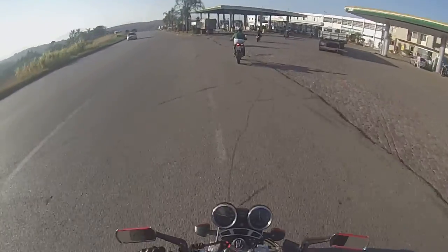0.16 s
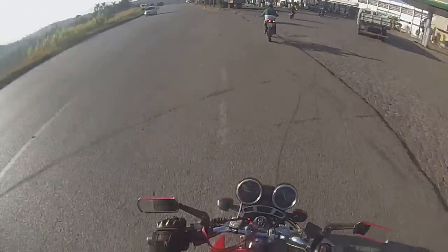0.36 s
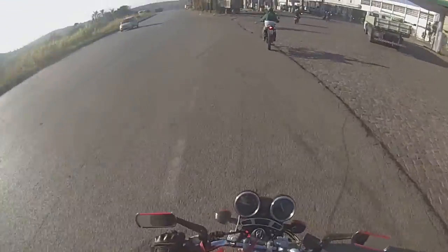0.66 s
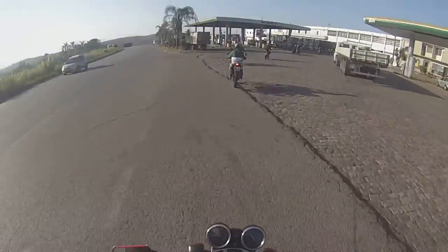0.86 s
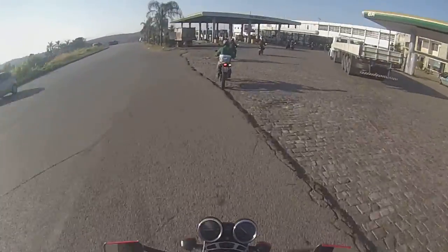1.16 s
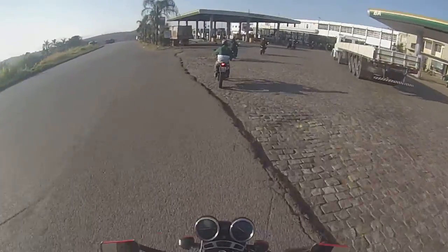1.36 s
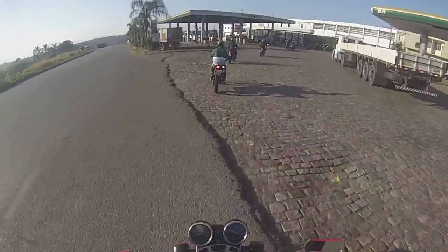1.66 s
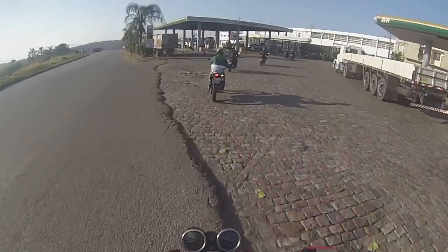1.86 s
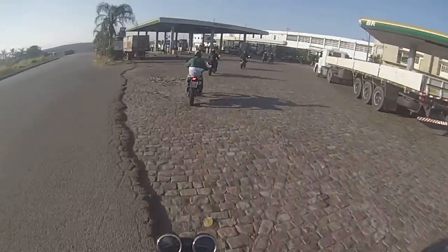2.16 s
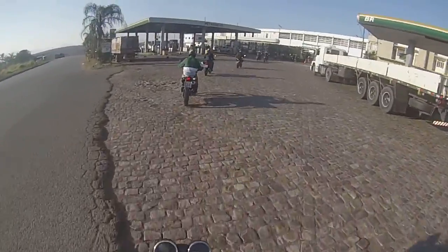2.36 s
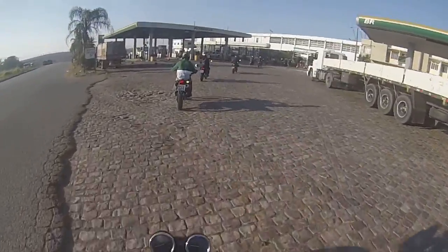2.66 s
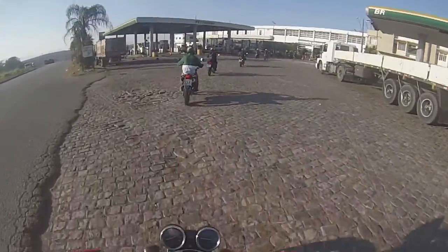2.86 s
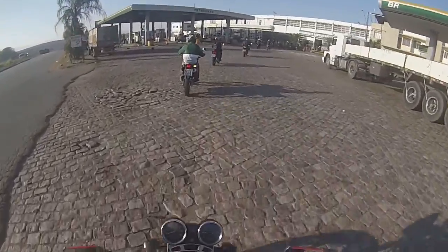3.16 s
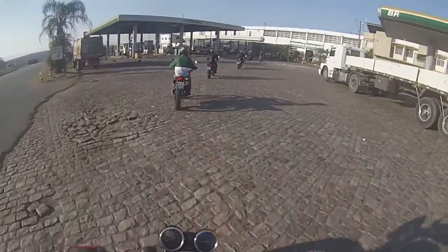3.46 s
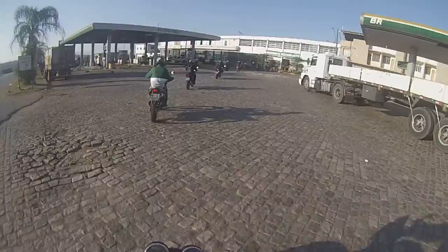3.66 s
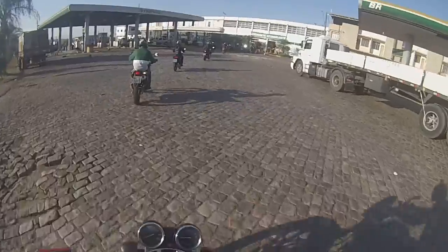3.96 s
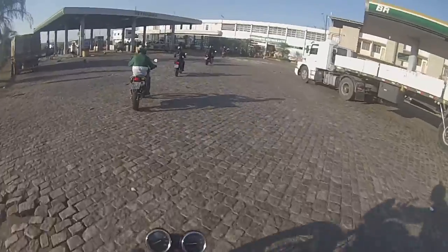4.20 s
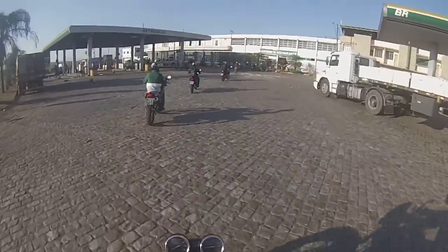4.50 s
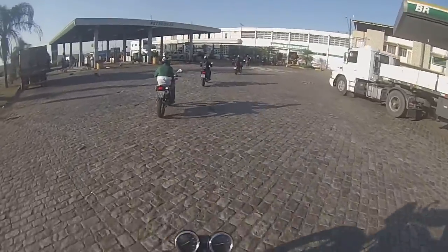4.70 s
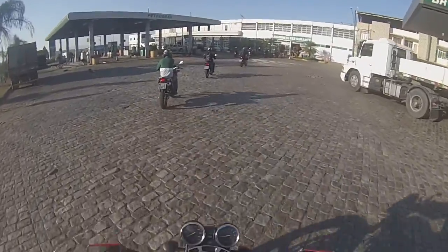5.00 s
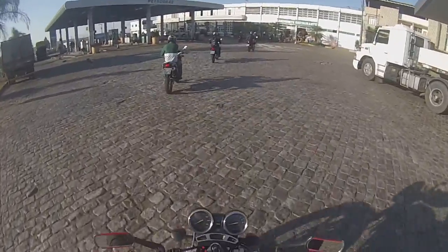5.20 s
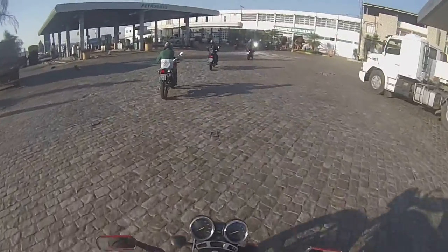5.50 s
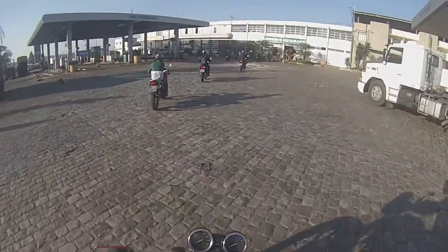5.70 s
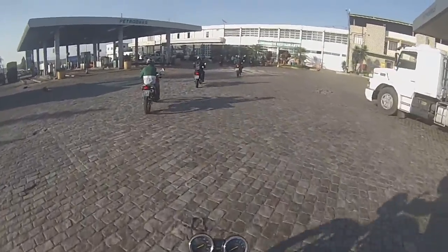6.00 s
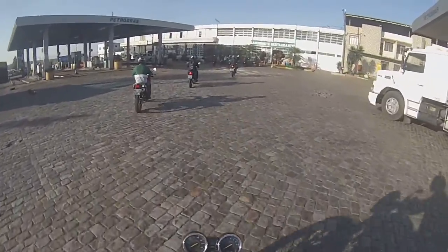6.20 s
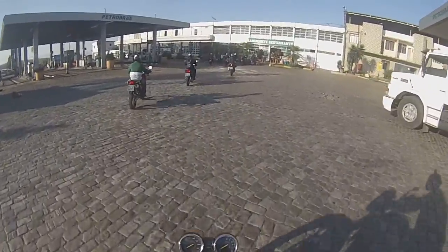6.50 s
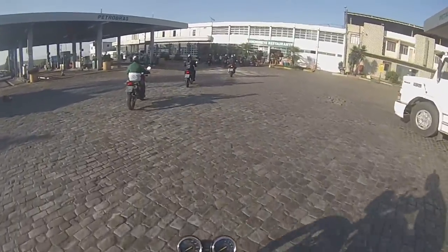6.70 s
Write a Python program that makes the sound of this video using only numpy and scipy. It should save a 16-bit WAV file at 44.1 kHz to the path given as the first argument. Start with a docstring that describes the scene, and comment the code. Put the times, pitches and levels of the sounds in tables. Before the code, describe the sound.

A motorcycle rolls off the throttle, heard close from a microphone on the rider. The boomy engine note sinks while the chain whirs and slaps, gears whine and the wind fades. An oncoming car passes with singing tyres. The bike then leaves the asphalt for cobblestones, which thump through the frame and set small metal and plastic parts rattling. Near idle at the end, the brake rubs in soft pulses.

```python
"""A motorcycle rolls off the throttle, leaves the asphalt and slows to a near idle over cobblestones.
Heard from a camera case on the rider: the exhaust's harmonics sink through the boom of the case, the
chain whirrs and slaps, gears whine and the wind dies away. An oncoming car passes with singing tyres.
Stones thump through the frame and rattle small parts, and at the end the brake rubs in pulses."""
import sys
import numpy as np
from scipy import signal
from scipy.fft import rfft, irfft
from scipy.io import wavfile
from scipy.ndimage import uniform_filter1d

SR = 44100
rng = np.random.default_rng(int(sys.argv[2]) if len(sys.argv) > 2 else 0)


def output_pcm(signal):
    """Save a mono or channel-first signal as 16-bit PCM at the path in sys.argv[1].

    Samples are clipped to [-1, 1] before scaling.
    """
    pcm = np.clip(np.atleast_2d(signal).T, -1, 1) * 32767
    wavfile.write(sys.argv[1], SR, np.round(pcm).astype(np.int16))


N = 302085
TIME = np.arange(N) / SR
BINS = np.maximum(np.fft.rfftfreq(N, 1 / SR), 1)

# engine firing rate: t/s, f/Hz
FIRING_RATE = [(0, 47.6), (.09, 44.6), (.2, 42), (.31, 35.6), (.39, 36.6), (.52, 37.8), (.88, 33.2),
               (1.0, 32), (1.32, 30.3), (1.39, 26.7), (1.68, 25.3), (2.0, 23.5), (2.2, 22.5), (3.6, 19.3),
               (5.2, 13.8), (6.85, 12.3)]
# exhaust fader, falling once the throttle is shut: t/s, gain/dB
EXHAUST_FADER = [(0, -28.5), (.07, -34.5), (.12, -32), (.16, -31), (.22, -34.5), (.35, -37), (.6, -36.5),
                 (.88, -38), (1.28, -38.5), (1.43, -43.5), (1.55, -42.5), (1.75, -41), (2.1, -47),
                 (3.0, -48.5), (5.3, -57), (6.85, -52.5)]
# fixed EQ that the exhaust orders sink through: f/Hz, gain/dB
EXHAUST_EQ = [(40, -27), (62, -9.5), (78, -7), (88, -0.5), (99, 3.5), (112, -3), (125, -9.5), (150, -27),
              (195, -22), (255, -43), (330, -20), (425, -16), (520, -36), (900, -38)]
# orders the silencer favours or cancels: multiple of the firing rate, gain/dB
SILENCER_ORDERS = [(2, -4), (3, -0.5), (4, 0), (5, -2.5), (6, 0), (7, -3.5), (8, -1.5), (9, -6), (10, -3),
                   (11, -2.5), (12, 0.5), (13, -6), (14, -3.5), (16, -3.5)]

# crossfade from asphalt to cobbles: t/s, cobble share/0-1
COBBLE_SHARE = [(1.9, 0), (2.5, 0.83)]
# hum of the shaken case: f/Hz, gain/dB
CASE_EQ = [(45, -30), (68, -5.5), (86, -0.5), (101, 1.5), (118, -19.5), (140, -15.5), (170, -21),
           (210, -44), (290, -25.5), (450, -49.5)]
# stones thump and the case booms: t/s, length/s, f/Hz, peak level/dB
THUMPS = [(0.45, 0.2, 84, -36), (0.55, .1, 74, -39), (2.397, 0.082, 111, -41.5), (2.603, 0.047, 98, -40),
          (2.74, 0.057, 106, -36.5), (2.823, 0.14, 96, -34), (2.886, 0.06, 91, -36), (2.98, 0.1, 94, -41),
          (3.182, 0.042, 86, -38), (3.286, 0.077, 96, -43), (3.544, 0.093, 89, -37.5),
          (3.681, 0.064, 82, -33), (3.735, 0.054, 93, -36), (3.795, 0.048, 102, -34), (3.847, .07, 92, -40),
          (3.945, .07, 87, -36), (4.186, 0.1, 89, -35), (4.247, .05, 96, -44), (4.322, 0.052, 96, -38),
          (4.716, 0.068, 88, -38), (4.774, 0.063, 98, -39), (4.837, .06, 91, -34), (4.91, 0.06, 90, -35),
          (5.004, 0.068, 93, -36.5), (5.307, 0.071, 83, -46), (5.482, 0.13, 92, -40.5),
          (5.668, 0.055, 85, -41), (5.713, 0.075, 97, -35.5), (5.817, .07, 91, -43), (6.113, .08, 83, -37),
          (6.249, 0.039, 90, -43), (6.476, 0.069, 91, -34.5), (6.845, 0.089, 100, -41)]
# the hardest stones jar the frame: t/s, length/s, level/dB
JARS = [(2.794, 0.042, -49), (2.879, .05, -58), (3.69, 0.076, -49), (3.77, 0.078, -50), (3.838, 0.071, -49),
        (6.81, 0.11, -54.5)]
# thud of the frame: f/Hz, gain/dB
THUD_EQ = [(110, 4), (150, 7), (215, -10), (285, 4), (380, -0.5), (500, -4.5), (650, -24)]
# slow jolts of the suspension: t/s, length/s, level/dB
BUMPS = [(.41, 0.21, -38.5), (0.553, 0.11, -36), (1.061, .14, -36.5), (1.564, 0.12, -40), (2.374, 0.2, -41),
         (2.515, 0.41, -40.5), (2.835, 0.15, -31.5), (2.963, 0.25, -37.5), (3.178, .16, -31),
         (3.317, 0.17, -38), (3.432, 0.14, -37), (3.546, 0.16, -30.5), (3.657, 0.08, -27.5),
         (3.728, 0.12, -29), (3.796, 0.084, -31), (3.93, 0.14, -28), (4.084, 0.069, -32), (4.199, 0.1, -31),
         (4.476, 0.15, -32.5), (4.629, .12, -35.5), (4.828, 0.21, -35), (4.946, 0.2, -34.5),
         (5.152, 0.19, -34), (5.261, 0.13, -33), (5.36, 0.12, -33.5), (5.446, 0.15, -33), (5.59, 0.24, -35),
         (5.747, 0.14, -30), (5.846, 0.16, -32.5), (6.122, 0.12, -39), (6.197, 0.18, -35),
         (6.497, 0.081, -34.5), (6.627, 0.13, -39), (6.74, 0.068, -29), (6.826, 0.14, -34.5)]
# sub-bass buffeting: f/Hz, gain/dB
BUFFET_EQ = [(8, -4.5), (15, 4), (22, 6.5), (33, -5.5), (48, -9.5), (65, -31), (110, -27), (250, -51)]
# rush of air and tyres: t/s, level/dB
RUSH_FADER = [(0, -48), (.2, -46.5), (.3, -50), (1.3, -52), (1.75, -52), (2.15, -56.5), (3.7, -55),
              (6.85, -57)]
# midrange body of that rush: f/Hz, gain/dB
RUSH_EQ = [(100, -45), (170, -5.5), (215, -2), (270, 4), (320, 7), (370, 0), (440, 3), (550, -3),
           (740, -1.5), (950, -4), (1400, -13), (3000, -24.5)]
# tyre hiss and grit: f/Hz, gain/dB
HISS_EQ = [(1500, 6.5), (2700, -2.5), (3200, -2), (4200, -3), (4900, -5), (5750, -9.5), (6500, -6),
           (7400, -9.5), (8300, -12), (10000, -14), (11200, -15), (15000, -20.5)]

# chain whirr: t/s, gain/dB
WHIRR_FADER = [(0, -41.5), (.55, -43.5), (1.2, -38), (1.65, -40), (2.2, -41), (2.5, -45), (2.9, -48.5),
               (3.3, -47), (3.55, -46.5), (4.05, -51.5), (5.05, -52.5), (5.3, -54.5), (6.85, -52.5)]
# resonances of the case and running gear: f/Hz, width/Hz, gain/dB
WHIRR_MODES = [(1098, 39, -2.5), (1239, 58, 0), (1279, 68, -0.5), (1383, 94, -5), (1534, 54, -5.5),
               (1768, 77, -17)]
# the one sharp ring in the whirr: t/s, f/Hz
WHIRR_PITCH = [(0, 1312), (.25, 1291), (.45, 1322), (.62, 1305), (.8, 1237), (1.02, 1271), (1.25, 1306),
               (2.05, 1316), (2.25, 1287), (2.45, 1321), (3.6, 1325)]
# how much of the whirr sits in that ring: t/s, power share/0-1
WHIRR_FOCUS = [(0, 0.55), (.5, 0.63), (.9, 0.24), (1.4, 0.15), (1.9, 0.17), (2.3, 0.45), (3.3, 0.2),
               (4.2, .15), (6.85, 0.03)]
# dry rubbing of chain and brake: t/s, gain/dB
RUB_FADER = [(0, -40), (.3, -45.5), (.7, -44), (.95, -43), (1.15, -47.5), (1.4, -45), (1.9, -48),
             (2.45, -51.5), (3.55, -53.5), (3.75, -51.5), (4.35, -51.5), (5.9, -54), (6.55, -52),
             (6.77, -50), (6.85, -50)]
# resonances of the rubbing chain: f/Hz, width/Hz, gain/dB
CHAIN_MODES = [(1743, 140, 5), (2118, 154, 4.6), (2365, 150, 0.5)]

# wind over the case: t/s, level/dB
WIND_FADER = [(0, -54.5), (.2, -59.5), (.5, -66), (1.0, -74), (1.7, -70), (2.1, -77), (2.8, -86),
              (6.85, -89)]
# its edge tones: f/Hz, width/Hz, gain/dB
EDGE_TONES = [(3330, 450, 0.5), (4970, 450, -2.5), (6240, 170, 2.5), (6930, 720, -5.5), (8900, 680, -9.5),
              (12100, 880, -10)]
# jingle of loose fittings: t/s, gain/dB
JINGLE_FADER = [(0, -70), (1.3, -52), (2.2, -58), (3.0, -55), (3.7, -58), (4.6, -58), (5.4, -61.5),
                (6.85, -64)]
# the fittings: f/Hz, gain/dB, t60/s, touch rate/Hz, shaken loose at t/s
FITTINGS = [(2444, 8, 0.027, 12, 3), (3747, -5, 0.055, 28, 4), (3896, -8, 0.046, 18, 0),
            (4550, -7, 0.027, 13, -3), (4640, -5, 0.027, 16, -2), (5465, -5, .025, 15, 3.5),
            (6470, -12, 0.03, 26, 2.5), (6870, -9, 0.024, 15, 2.7), (7900, -12, 0.04, 13, 0),
            (11030, -11, 0.017, 10, 1.4)]
# plastic ticks on bumps: t/s, crunch level/dB, snap gain/dB
TICKS = [(0.0448, -45, -52), (0.329, -54, -57), (0.3441, -54, -54), (0.368, -51, -56), (2.2111, -54, -58),
         (2.267, -54, -57), (2.331, -60, -58), (2.3453, -55, -55), (2.357, -57, -60), (2.369, -60, -55),
         (2.381, -61, -59), (2.4041, -59, -60), (2.625, -59, -61), (2.7967, -58, -55), (2.8256, -61.5, -57),
         (3.2651, -64, -59), (3.292, -56, -61), (3.327, -54, -58), (3.3565, -56, -57), (3.369, -56, -60),
         (3.4862, -54, -62), (3.6243, -58, -62), (3.635, -61, -57), (3.6588, -58, -57), (3.6797, -50, -61),
         (3.7065, -58, -60), (3.716, -58, -66), (3.7519, -55, -64), (3.764, -62, -64), (3.783, -64, -64),
         (3.8853, -53, -60), (3.894, -58, -59), (3.9314, -56, -58), (3.9521, -62, -57), (3.978, -65, -62),
         (5.7018, -52, -59), (5.774, -54.5, -66), (6.2479, -54, -60)]
# dull crunch of a tick: f/Hz, gain/dB
CRUNCH_EQ = [(2000, 14.5), (3000, 10), (4400, 8.5), (5300, -1), (5900, 0), (6400, 11.5), (7000, 1),
             (7700, -7), (12000, -18)]
# crisp snap of a tick: f/Hz, gain/dB
SNAP_EQ = [(4000, -6), (7000, -12), (8200, 2), (10000, -5), (11200, -2), (13000, -9), (15000, -15)]
# the chain slaps: t/s, length/s, level/dB
SLAPS = [(0.154, .04, -46), (0.284, 0.057, -45), (0.428, 0.11, -39), (0.874, .02, -40), (0.925, 0.032, -39),
         (1.062, 0.022, -36), (1.206, 0.009, -36), (1.358, 0.017, -35), (1.54, 0.022, -36.5),
         (1.72, 0.018, -41), (1.748, 0.049, -35), (1.911, 0.015, -36.5), (1.975, 0.022, -34.5),
         (2.181, 0.057, -41), (3.313, 0.035, -42), (3.541, 0.016, -38), (6.256, 0.032, -48.5),
         (6.632, 0.011, -43)]

# gear whine: t/s, level/dB
WHINE_FADER = [(0, -70), (.7, -53), (.97, -53), (1.17, -58), (1.45, -57), (1.9, -58), (2.3, -59),
               (2.7, -85)]
# its partials: multiple of the mesh rate, gain/dB, smear/Hz
WHINE_PARTIALS = [(1, 5.5, 74), (2, -10.5, 1100), (3, -29, 330), (4, -37, 480)]
# resonances of the gear housing: f/Hz, gain/dB
HOUSING_EQ = [(1000, -4.5), (1440, 3), (1545, -11), (1620, 6), (1700, -14), (1800, 7), (1950, -4.5),
              (2280, -3), (2700, 1), (3350, 11), (4200, -5), (5200, -8), (7000, -14)]
# a ring in the rubbing climbs as the bike slows: t/s, f/Hz, level/dB
CLIMBING_RING = [(.5, 1896, -77), (.9, 2015, -56), (1.2, 2151, -54.5), (1.45, 2263, -55),
                 (1.8, 2475, -59.5), (2.2, 2548, -69), (2.5, 2581, -90)]
# hiss of the car's tyres: f/Hz, gain/dB
CAR_EQ = [(900, 15), (1500, 0), (2800, 11), (4100, -11), (4700, 1), (5300, -3), (5800, -7), (6500, -4.5),
          (7200, -15), (7700, -9), (8600, -28), (13000, -29)]

# a loose metal part tinks: t/s, strike gain/dB
TINKS = [(1.560, -59), (1.692, -59), (1.827, -60), (1.861, -66), (1.921, -65), (1.966, -64), (2.138, -63),
         (2.1787, -60), (2.2373, -55), (2.2717, -57), (2.3155, -59), (2.4588, -57), (2.5306, -60),
         (2.6603, -62), (2.696, -63), (2.7696, -59), (3.092, -68), (3.263, -68), (3.3622, -60),
         (3.592, -62), (3.925, -63), (4.6243, -60), (4.677, -63), (4.831, -65), (4.947, -67), (5.22, -66),
         (5.299, -64), (6.000, -57), (6.230, -61), (6.547, -59), (6.646, -61), (6.751, -62)]
# its modes: f/Hz, gain/dB, t60/s
TINK_MODES = [(4610, 5.5, 0.048), (4650, -7, .018), (7950, -16, .02)]
# a second part chinks at the edge of the cobbles: t/s, strike gain/dB
CHINKS = [(2.207, -62), (2.268, -57)]
# its modes: f/Hz, gain/dB, t60/s
CHINK_MODES = [(5280, 0, .04), (5560, -1, .035), (5720, -5, 0.033)]
# a third part clinks once the cobbles get rough: t/s, strike gain/dB
CLINKS = [(3.325, -60), (3.493, -62), (3.744, -64), (3.783, -64), (3.834, -61), (3.888, -62), (3.976, -59),
          (4.026, -60), (4.146, -60), (4.459, -60), (4.588, -62), (4.603, -54), (4.647, -63), (4.756, -63),
          (4.807, -61), (4.907, -57), (5.219, -59), (5.298, -61), (5.432, -59), (5.594, -60), (5.714, -63),
          (5.758, -63), (5.914, -62), (6.378, -59), (6.427, -61), (6.573, -63), (6.732, -57)]
# its modes: f/Hz, gain/dB, t60/s
CLINK_MODES = [(3770, 1.5, 0.086), (3830, -12, 0.042), (6850, -12, .03)]
# brief squeaks: t/s, length/s, f/Hz, gain/dB
SQUEAKS = [(2.476, 0.063, 7120, -75), (4.532, 0.019, 2400, -52.5), (5.681, 0.058, 6960, -73),
           (6.05, 0.022, 2500, -64)]
# light touches of the brake pads: t/s, level/dB
PAD_FADER = [(0, -69), (2.75, -51.5), (3.0, -46), (3.3, -43), (3.6, -54), (4.5, -58), (4.85, -51.5),
             (5.2, -57), (6.85, -81)]
# their resonances: f/Hz, width/Hz, gain/dB
PAD_MODES = [(1310, 107, 13), (1435, 440, 2.5), (1664, 52, -10)]
# the case knocks: t/s, strike gain/dB
KNOCKS = [(2.799, -37), (2.840, -44), (3.14, -43), (3.680, -47), (3.748, -40.5), (3.785, -44), (3.842, -43),
          (3.89, -45), (3.955, -46), (4.018, -42.5), (4.42, -67), (5.38, -52), (5.62, -50), (6.626, -51),
          (6.770, -42.5)]
# its modes: f/Hz, gain/dB, t60/s
KNOCK_MODES = [(163.5, -12, 0.086), (273, -8.5, 0.073), (1280, -3, 0.044), (1550, -23, 0.015),
               (2230, -5, 0.04), (2506, -11.5, 0.035)]
# chatter of the case in its mount: f/Hz, gain/dB
CHATTER_EQ = [(1200, -13), (1800, -10), (2200, 4), (2500, -1), (2900, -10), (4000, -15), (7000, -33)]
# crossfade from chain rub to brake: t/s, brake's power share/0-1
BRAKE_SHARE = [(0, 0.02), (5.1, 0.09), (5.6, 0.6), (6.0, 0.7), (6.85, 0.99)]
# resonances of the scraping brake: f/Hz, width/Hz, gain/dB
BRAKE_MODES = [(1567, 18, 4), (1870, 73, 1.5), (2050, 93, 2), (3600, 610, -19), (5320, 300, -17.5)]


def from_db(db):
    """Decibels to gain."""
    return 10 ** (np.asarray(db) / 20)


def unit_rms(x):
    """Scale to unit rms."""
    return x / np.sqrt(np.mean(x ** 2) + 1e-20)


def levelled(x, window_s):
    """Ride the gain to hold the running rms at one."""
    power = uniform_filter1d(x ** 2, max(int(window_s * SR), 2))
    return x / np.sqrt(np.maximum(power, 0) + 1e-4 * np.mean(x ** 2))


def curve(rows, column=1):
    """One column of an automation table at every sample."""
    columns = np.transpose(rows)
    return np.interp(TIME, columns[0], columns[column])


def fader(rows):
    """Gain at every sample from automation in dB."""
    return from_db(curve(rows))


def drift(rate_hz):
    """Smooth random modulation with unit spread."""
    hop = 16
    knots = N // hop + 2
    hz = np.fft.rfftfreq(knots, hop / SR)
    slow = irfft(rfft(rng.standard_normal(knots)) / (1 + (hz / rate_hz) ** 2), knots)
    return np.interp(np.arange(N) / hop, np.arange(knots), unit_rms(slow))


def equalised(x, eq):
    """Apply an EQ curve, rolled off beyond its ends; unit rms."""
    hz, db = np.transpose(eq)
    skirts = 1 / (1 + (BINS / hz[-1] / 2) ** 4) / (1 + (hz[0] / BINS / 2) ** 4)
    gain = from_db(np.interp(np.log(BINS), np.log(hz), db))
    return unit_rms(irfft(rfft(x) * skirts * gain, N))


def noise(eq):
    """Noise with the colour of an EQ curve; unit rms."""
    return equalised(rng.standard_normal(N), eq)


def resonate(x, hz, width_hz):
    """One resonance with unit gain at its peak."""
    r = np.exp(-np.pi * width_hz / SR)
    feedback = [1, -2 * r * np.cos(2 * np.pi * hz / SR), r * r]
    return signal.lfilter(np.array([1, 0, -1]) * (1 - r * r) / 2, feedback, x)


def band(x, low_hz, high_hz, order):
    """Band-pass."""
    return signal.sosfilt(signal.butter(order, [low_hz, high_hz], "band", fs=SR, output="sos"), x)


def ring(clicks, hz, t60):
    """A unit click sets a sine of height one ringing."""
    r, w = from_db(-60 / (t60 * SR)), 2 * np.pi * hz / SR
    return signal.lfilter([0, np.sin(w)], [1, -2 * r * np.cos(w), r * r], clicks + 1e-18)


def strikes(events):
    """One click for each event."""
    times, db = np.transpose(events)
    clicks = np.zeros(N)
    clicks[(times * SR).astype(int)] = from_db(db)
    return clicks


def struck(events, modes):
    """Blows ring the modes of a small body."""
    clicks = strikes(events)
    return sum(from_db(db) * ring(clicks, hz, t60) for hz, db, t60 in modes)


def bursts(events, eq, decay_s):
    """Each event is a noisy burst of micro-cracks that dies away."""
    envelope = signal.lfilter([1], [1, -np.exp(-1 / (decay_s * SR))], strikes(events) + 1e-18)
    return envelope * noise(eq)


def swell(t, length):
    """A smooth rise and fall centred on t."""
    return np.cos(np.pi * np.clip((TIME - t) / length, -.5, .5)) ** 2


def swells(events):
    """An envelope with one swell of force for each event."""
    return sum(from_db(db) * swell(t, length) for t, length, db in events)


def phase_of(hz):
    """Running phase of a moving pitch."""
    return 2 * np.pi * np.cumsum(hz) / SR


def smeared(phase, smear_hz):
    """A tone broadened into a narrow band; unit level."""
    return drift(smear_hz) * np.sin(phase) + drift(smear_hz) * np.cos(phase)


def friction(modes, grain_db, band_hz):
    """Grainy sliding contact excites each mode; unit level."""
    grain = from_db(grain_db * drift(76))
    rings = sum(from_db(db) * resonate(grain * rng.standard_normal(N), hz, width)
                for hz, width, db in modes)
    return levelled(band(rings, *band_hz, order=3), 0.16)


def on_surface(asphalt_db, cobble_db):
    """A gain that slides from its asphalt setting towards its cobble setting."""
    return from_db(asphalt_db + curve(COBBLE_SHARE) * (cobble_db - asphalt_db))


def lumps(depth_db=3.2, rate_hz=15):
    """An uneven gain, as stone after stone passes under the wheels."""
    return from_db(depth_db * curve(COBBLE_SHARE) * drift(rate_hz))


def exhaust(cycles, firing_hz, unevenness=.12, stumble_cycles=.002):
    """Orders of the firing rate swell in turn as they sink through the boom near 100 Hz."""
    eq_hz, eq_db = np.transpose(EXHAUST_EQ)
    orders, lift_db = np.transpose(SILENCER_ORDERS)
    cycles = cycles + stumble_cycles * drift(19)   # on a shut throttle, firings come early or late
    tone = 0
    for k in range(2, 17):
        weight = from_db(np.interp(k * firing_hz, eq_hz, eq_db) + np.interp(k, orders, lift_db))
        tone += weight * np.sin(2 * np.pi * (k * cycles + rng.random()))
    strength = 1 + unevenness * drift(26)   # no two firings are quite alike
    return fader(EXHAUST_FADER) * strength * tone


def road_shake(thump_envelope):
    """The road keeps the case humming; each thump booms, thuds in the frame and clatters the chain."""
    hum = on_surface(asphalt_db=-50, cobble_db=-52) * lumps() * levelled(noise(CASE_EQ), 0.0405)
    booms = sum(from_db(db) * swell(t, length) * np.sin(2 * np.pi * (hz * TIME + rng.random()))
                for t, length, hz, db in THUMPS)
    thud = np.hypot(from_db(-19) * thump_envelope, swells(JARS)) * levelled(noise(THUD_EQ), .03)
    clatter = from_db(-22) * thump_envelope * friction(CHAIN_MODES, grain_db=0.5, band_hz=(1210, 4030))
    return hum + booms + thud + clatter


def air_and_road(firing_hz, thump_envelope):
    """Slow buffeting, the rush of the tyres, and a hiss that turns gritty on the cobbles."""
    sway = np.hypot(on_surface(asphalt_db=-48, cobble_db=-43) * lumps(), swells(BUMPS))
    buffet = sway * levelled(noise(BUFFET_EQ), 0.054)
    rush = fader(RUSH_FADER) * noise(RUSH_EQ)
    grains = rng.standard_normal(N) * from_db(2 * curve(COBBLE_SHARE) * drift(140))
    rolling_db = -60.5 + 4 * np.log2(firing_hz / 30)   # hiss on asphalt grows with speed
    grit_spray = from_db(-33) * thump_envelope
    hiss_gain = np.hypot(on_surface(rolling_db, cobble_db=-61.5), grit_spray)
    return buffet + rush + hiss_gain * equalised(grains, HISS_EQ)


def chain_whirr():
    """The running chain: a sharp ring wanders near 1.3 kHz in a broader cluster of resonances."""
    focus = curve(WHIRR_FOCUS)
    cluster = friction(WHIRR_MODES, grain_db=1, band_hz=(853, 2110))
    sharp = levelled(smeared(phase_of(curve(WHIRR_PITCH)), smear_hz=42), 0.94)
    blend = np.sqrt(focus) * sharp + np.sqrt(1 - focus) * cluster
    return from_db(-1.57) * fader(WHIRR_FADER) * blend


def chain_rub():
    """Dry friction of the chain, fading out as the brake takes over."""
    rub = from_db(-4.5) * friction(CHAIN_MODES, grain_db=0.5, band_hz=(1270, 3150))
    return fader(RUB_FADER) * np.sqrt(1 - curve(BRAKE_SHARE)) * rub


def wind():
    """Air hisses over the edges of the case while the bike is still fast."""
    air = rng.standard_normal(N)
    edges = sum((-1) ** k * from_db(db) * resonate(air, hz, width)
                for k, (hz, width, db) in enumerate(EDGE_TONES))
    return fader(WIND_FADER) * unit_rms(band(edges, 1700, 10500, order=2))


def jingle():
    """Fittings touch at random, each with its own note, once the road has shaken them loose."""
    out = np.zeros(N)
    for hz, db, t60, touch_rate, loose_at in FITTINGS:
        touches = (rng.random(N) < touch_rate / SR) * (TIME > loose_at)
        force = fader(JINGLE_FADER) * from_db(db + rng.uniform(-2, 2.8, N))
        out += resonate(ring(touches * force, hz, t60), hz, width_hz=500)
    return out


def plastic_ticks():
    """Plastic ticks on bumps: a dull crunch topped with a crisp snap."""
    crunch = bursts([(t, db) for t, db, _ in TICKS], CRUNCH_EQ, decay_s=0.0092)
    snap = bursts([(t, db) for t, _, db in TICKS], SNAP_EQ, decay_s=0.003)
    return crunch + from_db(-3.5) * snap   # the case muffles the snap


def chain_slaps():
    """Each slap briefly swells the main resonance of the whirr."""
    return swells(SLAPS) * levelled(band(rng.standard_normal(N), 1329.6, 1383, order=3), 0.004)


def gear_whine(cycles, teeth_per_firing=57):
    """Teeth mesh at a multiple of engine speed; backlash smears the tone and the housing colours it."""
    mesh_phase = 2 * np.pi * teeth_per_firing * cycles
    teeth = sum(from_db(db) * smeared(k * mesh_phase, smear_hz) for k, db, smear_hz in WHINE_PARTIALS)
    return fader(WHINE_FADER) * equalised(teeth, HOUSING_EQ)


def climbing_ring():
    """A rough ring and its inharmonic overtone glide upwards."""
    hz, db = curve(CLIMBING_RING), curve(CLIMBING_RING, column=2)
    phase = phase_of(hz)
    overtone = from_db(-9.5) * smeared(1.52 * phase, smear_hz=170)
    return from_db(db) * (smeared(phase, smear_hz=90) + overtone)


def oncoming_car(pass_s=1.21, speed_m_s=25, gap_m=6.5, tread_hz=1707, wake_db=5):
    """The tread sings fore and aft and drops in pitch as the car passes; hiss trails behind it."""
    along_m = speed_m_s * (TIME - pass_s)
    distance_m = np.hypot(along_m, gap_m)
    receding = along_m / distance_m   # -1 far ahead, +1 far behind
    emitted_s = TIME - distance_m / 343   # the changing delay gives the Doppler drop
    song = levelled(smeared(2 * np.pi * tread_hz * emitted_s, smear_hz=40), 0.14)
    tread = from_db(-44) * np.hypot(receding, .3) * song
    hiss = from_db(-55 + wake_db * receding) * noise(CAR_EQ)
    return (gap_m / distance_m) ** 2 * (tread + hiss)


def metal_rattles():
    """The road knocks three loose metal parts, each with its own bright ring."""
    tinks = band(struck(TINKS, TINK_MODES), 4430, 4650, order=1)
    chinks = struck(CHINKS, CHINK_MODES)
    clinks = band(struck(CLINKS, CLINK_MODES), 3540, 3900, order=1)
    return tinks + chinks + clinks


def squeaks(waver=0.0045):
    """Short stick-slip tones with an unsteady pitch."""
    out = np.zeros(N)
    for t, length, hz, db in SQUEAKS:
        phase = phase_of(hz * (1 + waver * drift(106)))
        out += from_db(db + 9) * swell(t, length) * np.sin(phase)
    return out


def pad_touches():
    """The brake pads graze the disc and ring softly."""
    return fader(PAD_FADER) * friction(PAD_MODES, grain_db=-0.5, band_hz=(1270, 2020))


def case_knocks():
    """Each knock rings the case and leaves it chattering in its mount."""
    clicks = strikes(KNOCKS)
    body = sum((-1) ** k * from_db(db) * ring(clicks, hz, t60)
               for k, (hz, db, t60) in enumerate(KNOCK_MODES))
    chatter = from_db(-8.5) * bursts(KNOCKS, CHATTER_EQ, decay_s=0.019)
    return body + chatter


def brake_rub(disc_hz=6.06, low_spot_s=6.5, dip_db=7, dip_half_s=0.025):
    """The pads scrape and squeal on the disc, losing their grip briefly once a turn."""
    scrape = from_db(0.5) * friction(BRAKE_MODES, grain_db=2.5, band_hz=(1276.6, 6100))
    squeal_hz = 2000 + 50.03 * drift(22)   # wavers with pad pressure
    squeal = from_db(-1) * levelled(smeared(phase_of(squeal_hz), smear_hz=45), .06)
    from_low_spot_s = np.sin(np.pi * disc_hz * (TIME - low_spot_s)) / (np.pi * disc_hz)
    grip = from_db(-dip_db * np.exp(-(from_low_spot_s / dip_half_s) ** 2))
    return fader(RUB_FADER) * np.sqrt(curve(BRAKE_SHARE)) * grip * (scrape + squeal)


def scene():
    """Mono mix: engine and road carry the low end; drive, rattles, wind and car sit above them."""
    firing_hz = curve(FIRING_RATE)
    cycles = np.cumsum(firing_hz) / SR
    thump_envelope = swells([(t, length, db) for t, length, _, db in THUMPS])
    engine = exhaust(cycles, firing_hz)
    drive = chain_rub() + pad_touches() + brake_rub() + chain_whirr()
    drive += gear_whine(cycles) + chain_slaps() + climbing_ring()
    drive *= 1 + 0.11 * np.cos(2 * np.pi * cycles)   # each firing shakes the drive
    bed = road_shake(thump_envelope) + air_and_road(firing_hz, thump_envelope) + wind()
    rattles = plastic_ticks() + metal_rattles() + case_knocks() + jingle()
    return (engine + drive + bed + rattles + squeaks() + oncoming_car())[None]


def record(dry):
    """A steep high cut at 15.2 kHz."""
    return signal.sosfilt(signal.ellip(10, .2, 80, 15200, fs=SR, output="sos"), dry)


dry = scene()
out = record(dry)
output_pcm(out)
```